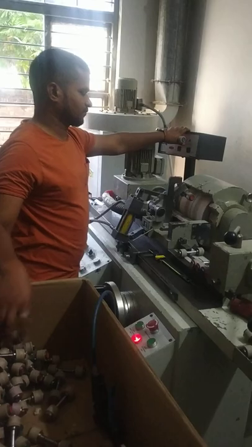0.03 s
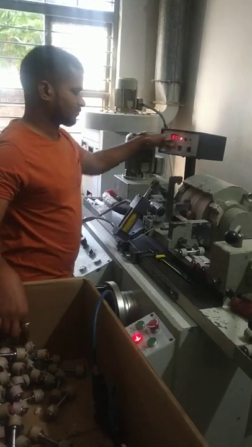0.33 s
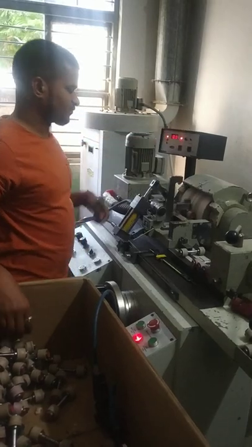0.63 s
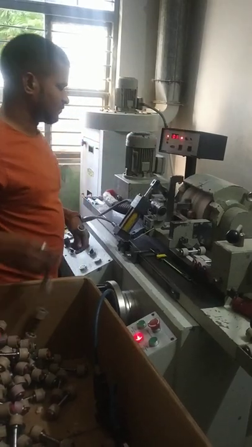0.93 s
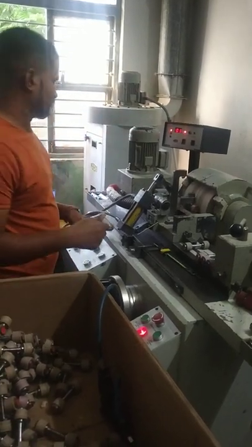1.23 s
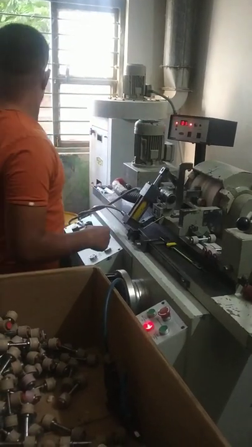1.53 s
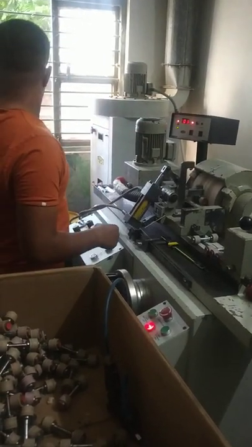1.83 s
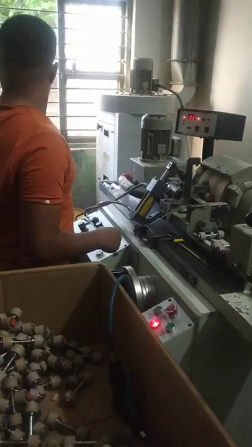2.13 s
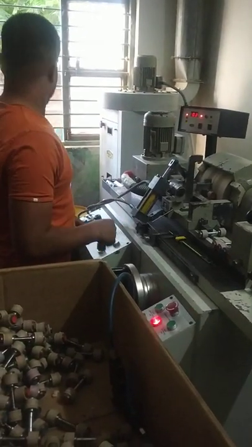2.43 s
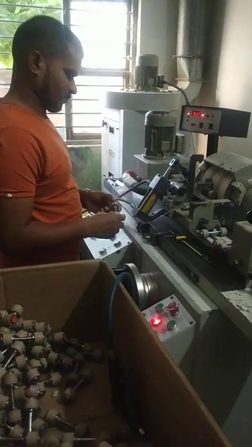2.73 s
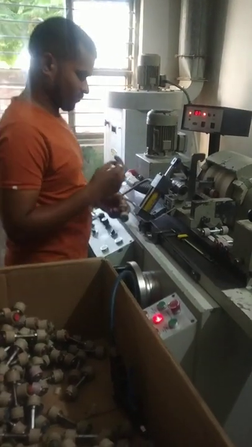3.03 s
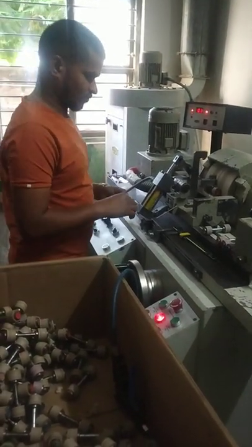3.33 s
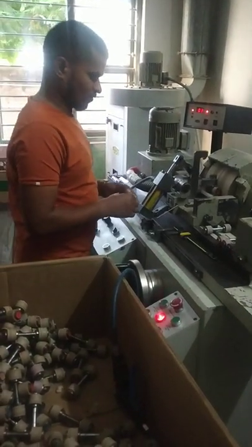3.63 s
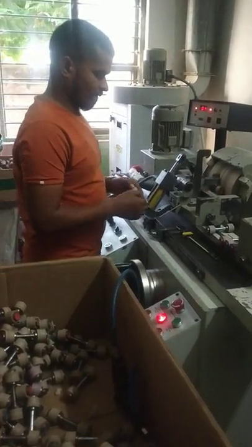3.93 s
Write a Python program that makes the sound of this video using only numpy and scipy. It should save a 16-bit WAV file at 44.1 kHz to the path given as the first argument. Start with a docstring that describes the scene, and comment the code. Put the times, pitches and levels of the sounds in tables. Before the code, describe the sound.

Close by in a hard-walled workshop, a machine runs with a wavering low hum, a rush of air and thin bearing whine. A few light metal ticks, two dull thuds and two short rasps pass over the drone.

```python
"""A buffing machine and its dust extractor swell in and run steadily in a hard-walled workshop.
Air rushes, fan turbulence booms in the duct, motors hum at their own pitches and bearings sing faintly.
A few small metal parts tick early on. Just after one second the frame knocks dully and the level
dips briefly. A second knock comes about a second later, then a wheel rubs twice as the drone carries on."""
import sys
import numpy as np
from scipy import signal
from scipy.fft import rfft, irfft
from scipy.io import wavfile

SR = 44100
rng = np.random.default_rng(int(sys.argv[2]) if len(sys.argv) > 2 else 0)


def file_out(sig):
    """Save sig as 16-bit WAV at sys.argv[1]."""
    # one column per channel
    cols = np.atleast_2d(sig).T
    # limit, then scale
    lim = np.clip(cols, -1, 1)
    pcm = np.round(lim * 32767).astype(np.int16)
    wavfile.write(sys.argv[1], SR, pcm)


N = 176400


def from_db(db):
    """Decibels to gain."""
    return 10 ** (np.asarray(db) / 20)


def unit_rms(x):
    """Scale to unit rms."""
    return x / np.sqrt(np.mean(x ** 2) + 1e-20)


def fader(rows):
    """Gain at every sample from rows of time_s, level_db."""
    return from_db(np.interp(np.arange(N) / SR, *np.transpose(rows)))


def bin_hz():
    """Frequency of every bin of the spectrum."""
    return np.maximum(np.arange(N // 2 + 1) * SR / N, 1)


def across_spectrum(rows):
    """Read rows of freq_hz, value at every bin, on a log axis."""
    hz, value = np.transpose(rows)
    return np.interp(np.log(bin_hz()), np.log(hz), value)


def drift(rate_hz):
    """Smooth random motion with unit spread."""
    spectrum = rfft(rng.standard_normal(N))
    return unit_rms(irfft(spectrum / (1 + (bin_hz() / rate_hz) ** 2), N))


def resonance(hz, width_hz):
    """Steep-sided peak of unit total power, as gain per root Hz."""
    shape = 1 / (1 + ((bin_hz() - hz) / (.75 * width_hz)) ** 2)
    return shape / np.sqrt(np.sum(shape ** 2) * SR / N)


def resonance_bank(rows):
    """Several resonances, added in power into one tone colour."""
    return np.sqrt(sum((from_db(db) * resonance(hz, width)) ** 2 for hz, width, db in rows))


# How alike left and right sound: freq_hz, correlation
STEREO_LIKENESS = [(60, 0.99), (200, 0.89), (320, 0.94), (420, 0.51), (700, 0.44), (1250, -0.095),
                   (2400, 0.16), (4400, -0.07), (15000, 0.022)]
# Lean of the stereo image: freq_hz, left_minus_right_db
STEREO_BALANCE = [(100, 1), (160, -2.5), (270, -0.1), (450, 0.5), (780, -2.5), (1250, 4.5), (2000, 4.5),
                  (2700, 1.6), (5500, 4.5), (8000, 1), (10000, 5), (15000, 3)]


def room_noise(colour):
    """Stereo noise of a given gain per root Hz: alike in the bass, diffuse in the treble."""
    mid, side = rfft(rng.standard_normal((2, N))) * np.sqrt(SR / 2)
    alike = np.clip(across_spectrum(STEREO_LIKENESS), -.99, .99)
    sides = np.array([[1], [-1]])
    pan = from_db(sides * across_spectrum(STEREO_BALANCE) / 2)
    pan = pan / np.sqrt(np.sum(pan ** 2, axis=0))
    stereo = np.sqrt(1 + alike) * mid + sides * np.sqrt(1 - alike) * side
    return irfft(colour * pan * stereo, N)


def reflections(ripple_db=1.5, decay_s=0.026):
    """Early reflections off walls and housings ripple the spectrum, less so in the bass."""
    echoes = rng.standard_normal(N) * np.exp(-np.arange(N) / SR / decay_s)
    ripple = unit_rms(rfft(echoes).real)
    return unit_rms(from_db(ripple_db * ripple * np.clip(bin_hz() / 2000, 0, 1)))


# Tone colour of the rush of air and wheels: freq_hz, density_db
RUSH_COLOUR = [(25, -103), (50, -84), (85, -78), (112, -61.5), (135, -62.5), (160, -54.5), (185, -43.5),
               (215, -42), (245, -43.5), (330, -44.5), (410, -43.5), (500, -49.5), (700, -52.5),
               (860, -50.5), (1000, -55), (1400, -55.5), (2000, -59), (2550, -61.5), (2850, -64),
               (4000, -65.5), (5000, -69), (6600, -73.5), (10500, -79), (13000, -76), (15500, -76)]
# Fader ride on the whole rush: time_s, level_db
RUSH_RIDE = [(.07, -1.5), (.3, 1), (.46, 0.5), (.62, -0.5), (.8, 0.5), (1.1, 1), (1.3, 0.3), (1.48, 1),
             (1.9, -1.5), (2.15, 0), (2.27, -2.5), (2.4, 0.5), (2.75, 0), (2.8, -1.2), (3.05, 0), (3.3, 0),
             (3.63, 1.5), (3.7, -0.8), (3.78, 2), (4, 0.2)]
# Extra ride on its top end: time_s, level_db
TREBLE_RIDE = [(.07, -1), (.8, -0.5), (1.3, 1.5), (2.2, 1.5), (2.7, 2.5), (4, 0.5)]


def air_rush(crossover_hz=10200, surge_db=0.37, flutter_db=0.91):
    """A broad bed of turbulence that surges and flutters; its treble has a level of its own."""
    colour = from_db(across_spectrum(RUSH_COLOUR)) * reflections()
    treble_share = 1 / (1 + (crossover_hz / bin_hz()) ** 6)
    body = room_noise(colour * np.sqrt(1 - treble_share))
    hiss = fader(TREBLE_RIDE) * room_noise(colour * np.sqrt(treble_share))
    gusts = from_db(surge_db * drift(rate_hz=11) + flutter_db * drift(rate_hz=18))
    return (body + hiss) * fader(RUSH_RIDE) * gusts


# Swells of the drone's lower note, near 277 Hz: time_s, level_db
LOWER_NOTE_RIDE = [(.07, 1), (.52, -8), (.59, 5), (.73, 2.2), (.83, -7), (1.0, -2), (1.5, -3.5),
                   (1.73, 3.5), (1.99, 4), (2.12, -3), (2.26, 7), (2.45, 1), (2.72, -3.5), (2.82, 4),
                   (2.96, -18), (3.09, 7), (3.2, -5.5), (3.4, 1.5), (3.55, -2), (4, -1)]
# Swells of its upper note, near 312 Hz: time_s, level_db
UPPER_NOTE_RIDE = [(.07, -4.5), (.37, 1), (.5, -8), (.9, 1), (1.25, -4.5), (1.55, 1), (1.83, 2.5),
                   (1.96, -3), (2.12, 2), (2.25, -5.5), (2.65, -3.5), (2.97, 3.5), (3.25, -1.5),
                   (3.38, 0.5), (3.7, 2), (4, -1.5)]


def drone_swell(hz):
    """Pitches around the drone's two main notes swell separately; the rest hold their level."""
    if 250 < hz < 290:
        return fader(LOWER_NOTE_RIDE)
    if 290 <= hz < 370:
        return fader(UPPER_NOTE_RIDE)
    return 1


# Resonances of the duct and housings: pitch_hz, width_hz, level_db
DUCT_MODES = [(114, 8.8, -56), (226, 5.4, -36), (276.6, 8.2, -24.5), (293, 2, -29.5), (309.5, 7.3, -25),
              (343.8, 13.6, -28.5), (475.7, 6.4, -35.5), (553, 8.9, -38.5), (818.4, 7.1, -40),
              (1100, 7.7, -42.5), (1405, 47, -36.5), (1646, 100, -41.5), (1810, 8.8, -55), (2483, 28, -41),
              (2648, 6, -44.5), (2690, 35, -48), (3980, 88, -49)]


def duct_boom():
    """Fan turbulence rings the duct's low resonances and the housings' higher ones."""
    low_modes = [row for row in DUCT_MODES if row[0] < 400]
    housings = room_noise(resonance_bank(DUCT_MODES[len(low_modes):]))
    boom = sum(drone_swell(hz) * room_noise(from_db(db) * resonance(hz, width))
               for hz, width, db in low_modes)
    return housings + boom


# Hum of the motors and their fan blades: pitch_hz, level_db
MOTOR_TONES = [(233.5, -30), (264, -27.5), (277.5, -23), (297, -26), (312.5, -22.5), (349.5, -29),
               (387.5, -35.5), (424, -40.5), (528, -42), (554, -37.5), (614, -39)]


def motor_hum(pitch_wander=0.00497, waver_db=1.4):
    """Motor tones waver in pitch and level and beat against each other."""
    out = 0
    for hz, db in MOTOR_TONES:
        pitch_hz = hz * (1 + pitch_wander * drift(rate_hz=2.09))
        cycles = np.cumsum(pitch_hz) / SR + rng.random()
        tone = np.sqrt(2) * np.sin(2 * np.pi * cycles)
        waver = unit_rms(from_db(waver_db * drift(rate_hz=3.9)))
        out = out + from_db(db) * drone_swell(hz) * waver * tone
    return out


# Narrow bands of bearing whine: pitch_hz, width_hz, level_db
WHINE_BANDS = [(8970, 30, -58), (10010, 50, -54), (10200, 60, -56), (11180, 150, -47.5), (11100, 20, -55),
               (11355, 14, -56), (12100, 40, -54), (12405, 50, -52), (12554, 45, -51), (12963, 30, -50),
               (13150, 80, -54), (13959, 30, -56), (14650, 110, -47)]
# Slow rise of the whine: time_s, level_db
WHINE_RIDE = [(.07, -13), (1.1, -5), (1.8, -1.5), (2.6, -1), (4, 2.5)]


def bearing_whine(shaft_hz=49, throb_depth=0.17):
    """The bearings sing thin and high, throbbing once per turn of the shaft."""
    whine = room_noise(resonance_bank(WHINE_BANDS))
    throb = unit_rms(1 + throb_depth * np.cos(2 * np.pi * shaft_hz * np.arange(N) / SR))
    return whine * throb * fader(WHINE_RIDE)


# Ticks of small metal parts: start_s, level_db, t60_s, centre_hz
TICK_CUES = [(.107, -23, 0.02, 5940), (.327, -27, 0.09, 6500), (0.336, -26, 0.07, 7500),
             (.767, -27, .035, 11000), (1.117, -29, .03, 9000)]


def metal_ticks():
    """Small metal parts tick: short bright bursts that die away in the room."""
    out = 0
    for start_s, db, t60_s, hz in TICK_CUES:
        age = np.arange(N) / SR - start_s
        envelope = (age > 0) * np.exp(-np.log(1000) * np.abs(age) / t60_s)
        out = out + from_db(db) * envelope * room_noise(resonance(hz, width_hz=0.88 * hz))
    return out


# Dull knocks in the frame: start_s, level_db, pitch_hz
KNOCK_CUES = [(1.112, -20.5, 155.3), (2.245, -20, 180)]


def frame_knocks(attack_s=0.012, t60_s=0.5):
    """The machine's frame thuds dully and booms for a moment."""
    out = 0
    for start_s, db, hz in KNOCK_CUES:
        age = np.maximum(np.arange(N) / SR - start_s, 0)
        envelope = np.minimum(age / attack_s, 1) * np.exp(-np.log(1000) * age / t60_s)
        out = out + from_db(db) * envelope * room_noise(resonance(hz, width_hz=9.9))
    return out


# Rubs of the wheel: start_s, length_s, peak_db
RUB_CUES = [(2.42, .13, -2.5), (2.597, 0.24, -1)]
# Tone colour of their rasp: freq_hz, density_db
RASP_COLOUR = [(300, -80), (1200, -60), (2300, -63), (3500, -83), (8000, -82), (15000, -83)]


def wheel_rubs(grain_db=0.5):
    """A wheel rubs briefly: a grainy rasp that rises and falls with the pressure."""
    t = np.arange(N) / SR
    pressure = sum(from_db(db) * np.sin(np.pi * np.clip((t - start_s) / length_s, 0, 1))
                   for start_s, length_s, db in RUB_CUES)
    grain = unit_rms(from_db(grain_db * drift(rate_hz=120)))
    return pressure * grain * room_noise(from_db(across_spectrum(RASP_COLOUR)))


# Master fader, with the opening swell and one brief dip: time_s, level_db
MASTER_RIDE = [(.063, -75), (.070, -14.5), (.11, -8), (.2, -4.5), (.34, -1.5), (.45, 0.5), (1.121, 0.5),
               (1.131, -9), (1.158, -6.5), (1.19, -1.5), (1.25, 0), (2.22, 1), (2.27, 0.5), (2.36, 0.5),
               (4, -0.5)]


def scene():
    """The running machine and its ticks, knocks and rubs, all under one fader."""
    bed = air_rush() + duct_boom() + motor_hum() + bearing_whine()
    return fader(MASTER_RIDE) * (bed + metal_ticks() + frame_knocks() + wheel_rubs())


def record(dry):
    """A soft clip rounds the highest peaks and a steep low-pass trims the top."""
    ceiling, cutoff_hz = .88, 15680
    rounded = dry / (1 + (np.abs(dry) / ceiling) ** 8) ** (1 / 8)
    low_pass = signal.ellip(12, .1, 80, cutoff_hz, fs=SR, output="sos")
    return signal.sosfilt(low_pass, rounded)


dry = scene()
out = record(dry)
file_out(out)
```